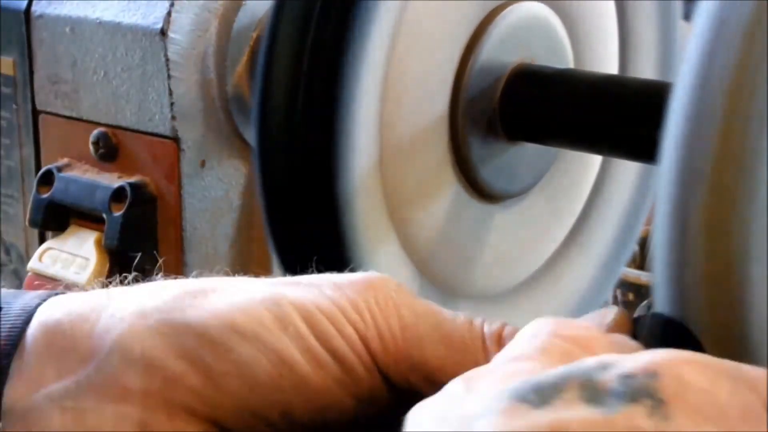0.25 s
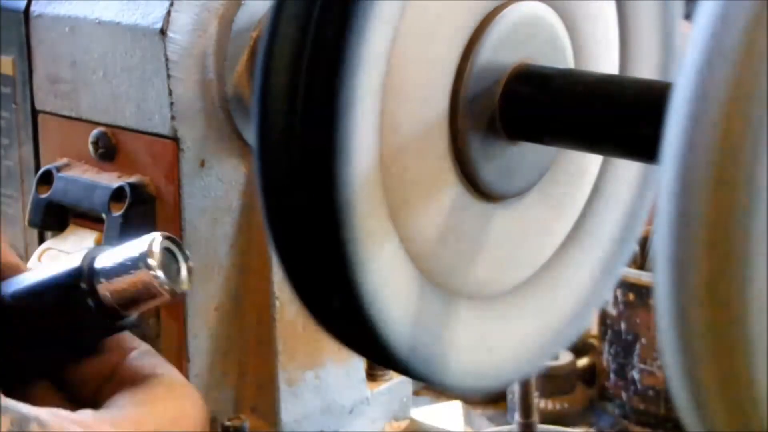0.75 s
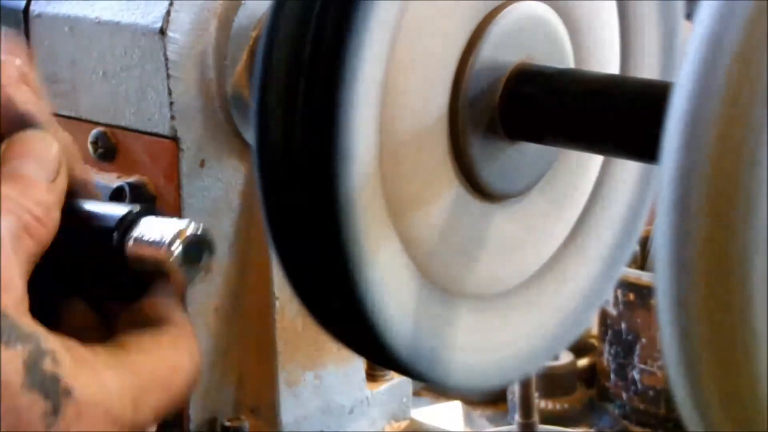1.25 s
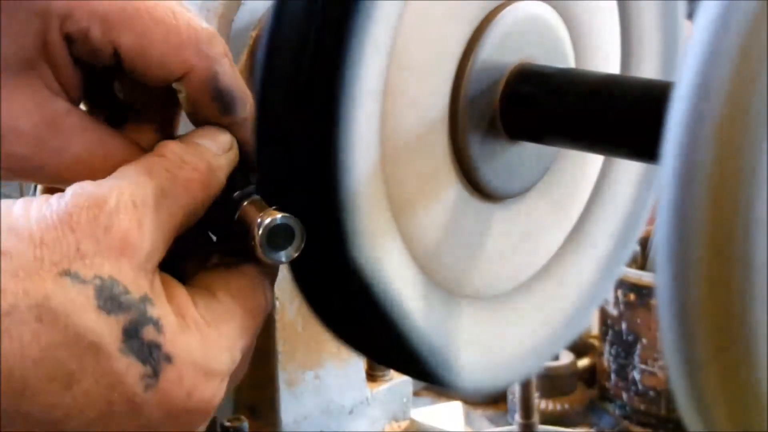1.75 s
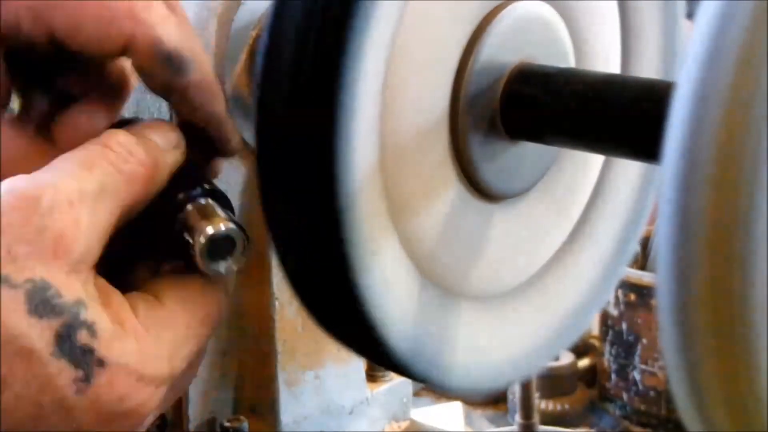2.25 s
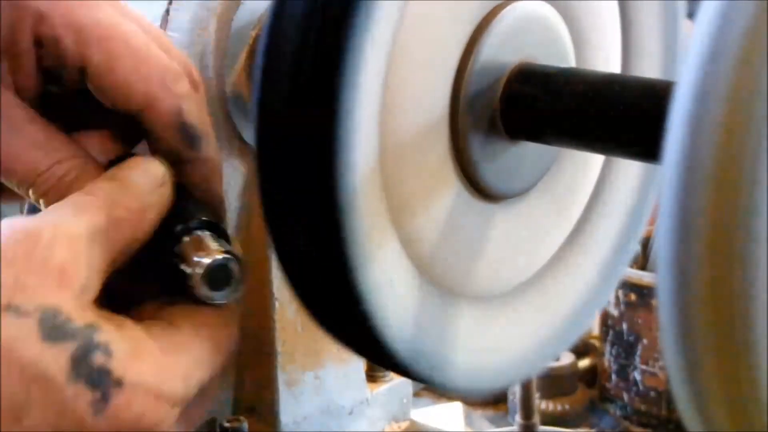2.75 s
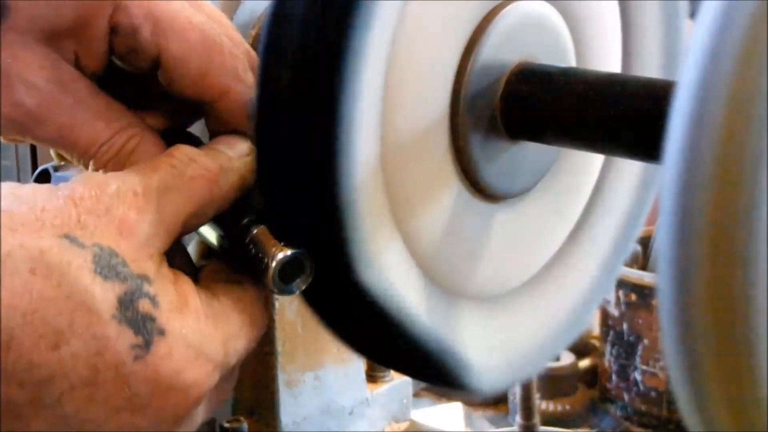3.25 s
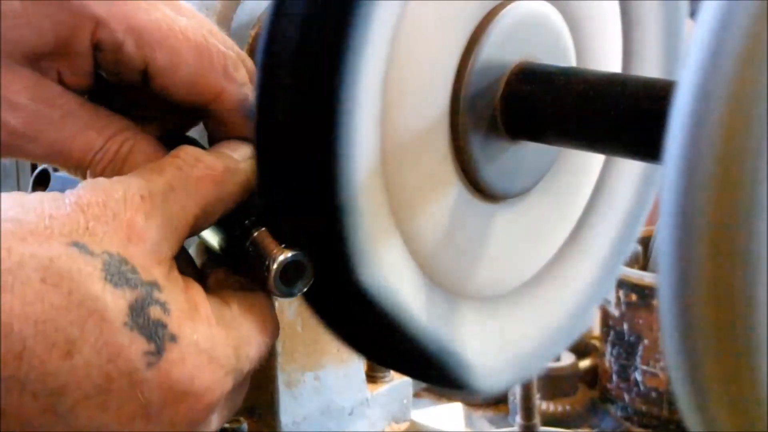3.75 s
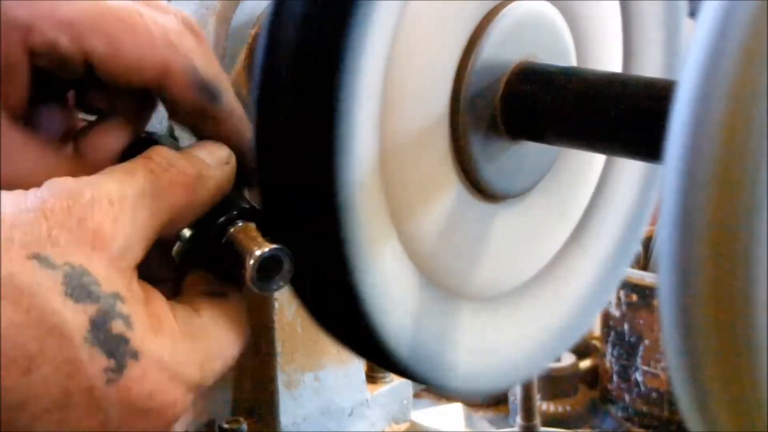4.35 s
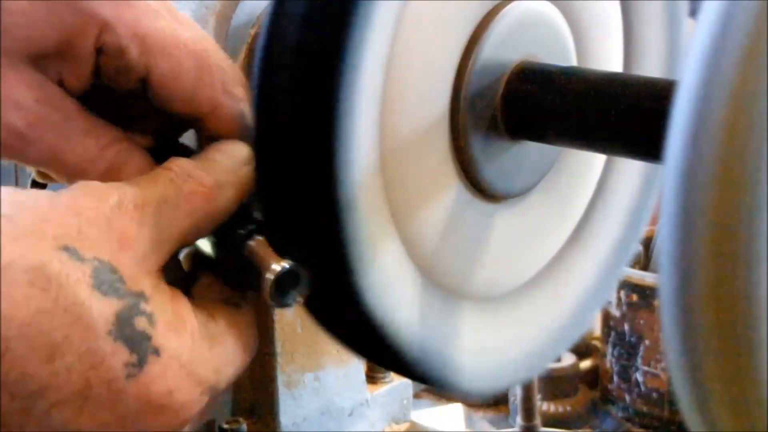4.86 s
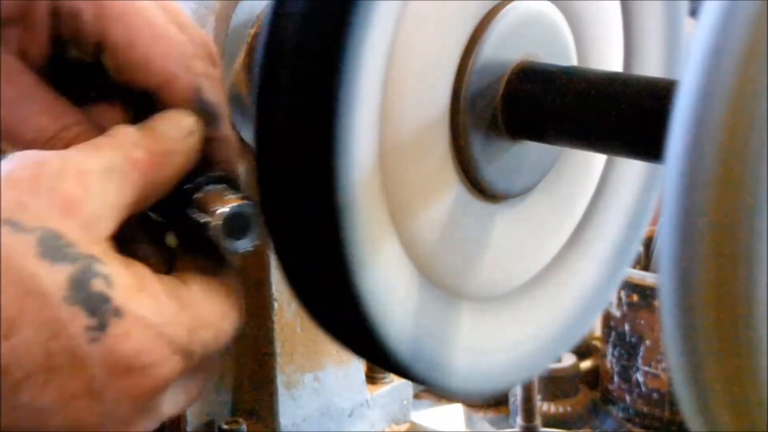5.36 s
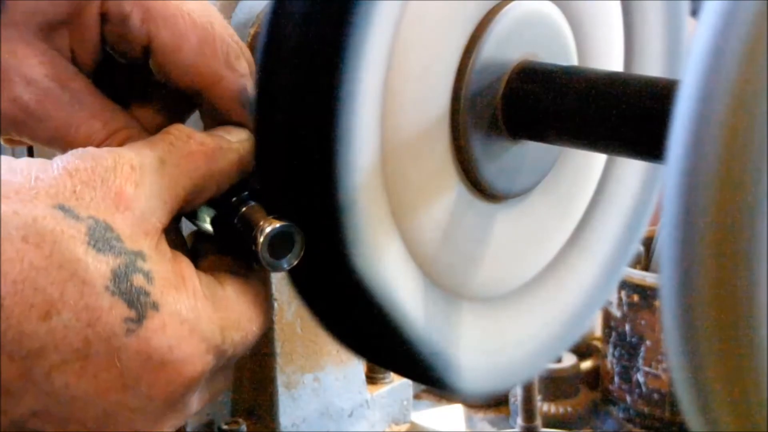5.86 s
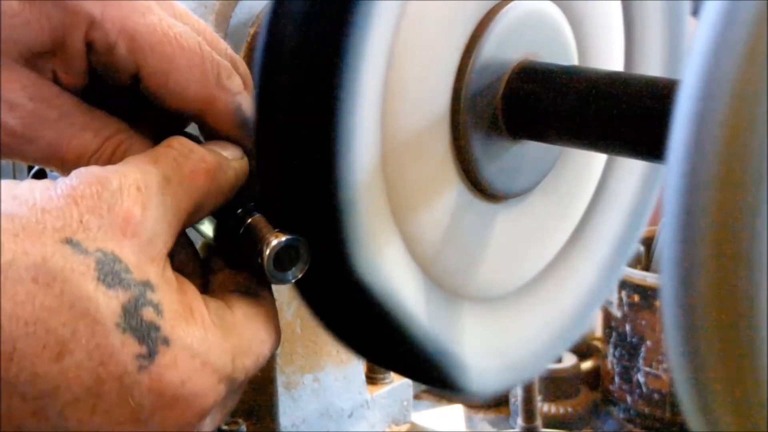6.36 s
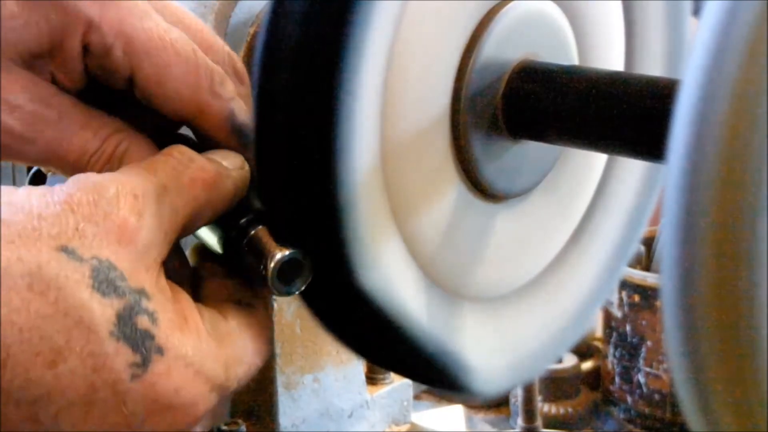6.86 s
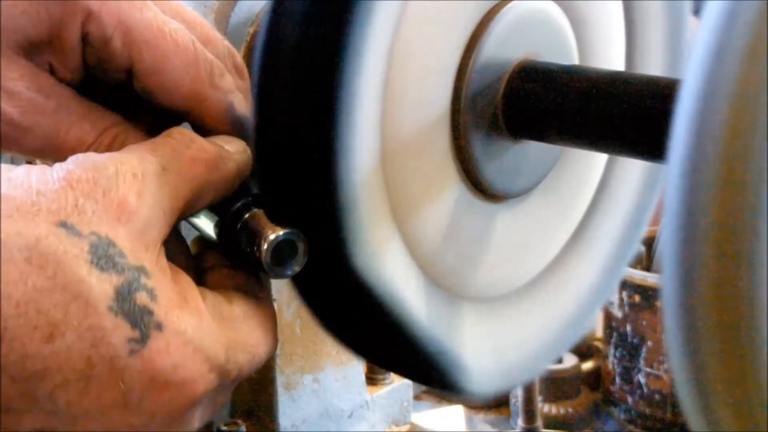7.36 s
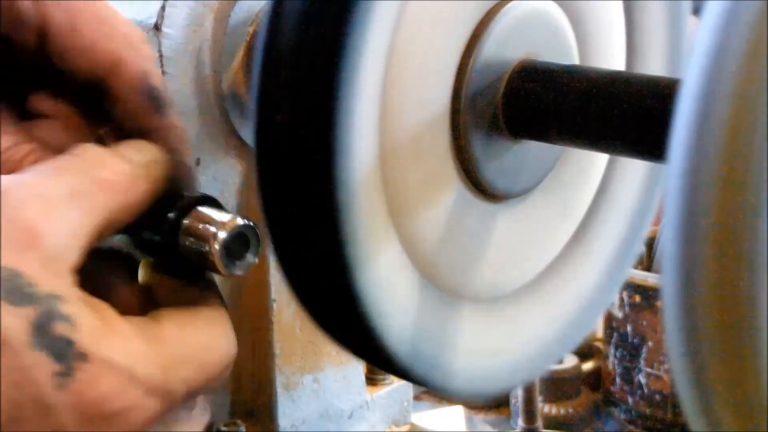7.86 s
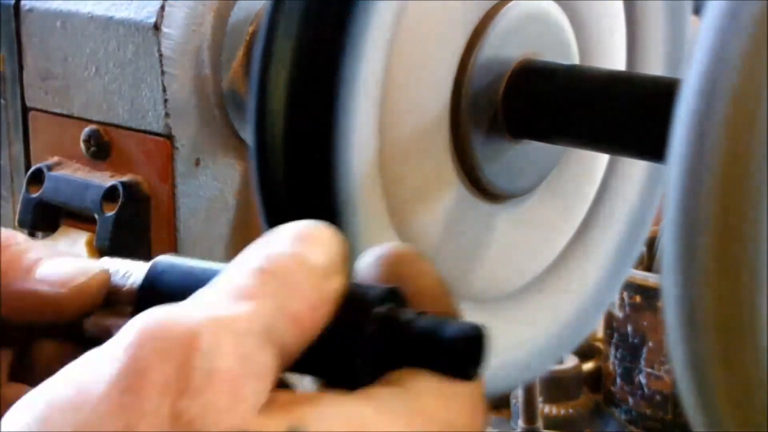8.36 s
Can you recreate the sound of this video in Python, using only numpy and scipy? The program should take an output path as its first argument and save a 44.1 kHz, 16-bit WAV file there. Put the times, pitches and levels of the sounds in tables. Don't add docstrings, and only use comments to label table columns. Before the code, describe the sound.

A buffing machine runs throughout, close to one mono microphone in a workshop: a shrill, metallic gear whine built on roughly 590 hertz with many bright overtones, slightly fluttering, wrapped in high airy hiss. Until about 0.5 s light grazes dip the pitch a little amid soft hand bumps and shuffling. A distant low compressor drone stops near 0.9 s, leaving faint mains hum and floor rumble. Small hollow taps sound at 0.7 and 1.2 s, then a hard double knock at 1.3 s and a ringing tap at 1.43 s. From about 1.6 to 7.85 s the piece is pressed repeatedly, in pushes of a quarter to half a second; each drags the whine down by several percent, adding coarse bearing rattle and cloth rubbing, then it springs quickly back up. One hollow tap comes at 5.3 s. After 7.9 s the free, clear whine continues steadily to the end, around 8.6 s.

```python
import sys
import numpy as np
from scipy import signal
from scipy.fft import rfft, irfft, next_fast_len
from scipy.io import wavfile
from scipy.ndimage import uniform_filter1d

SR = 44100
rng = np.random.default_rng(int(sys.argv[2]) if len(sys.argv) > 2 else 0)


def voltage_ratio(decibels):
    exponent = np.asarray(decibels, float) / 20
    return 10 ** exponent


def to_wav(s):
    ch = np.atleast_2d(s).T
    pcm = np.round(np.clip(ch, -1, 1) * 32767)
    wavfile.write(sys.argv[1], SR, pcm.astype(np.int16))


N = 379252

PARTNERS = [-.288, -.0752, 0, .0752, .288]


def unit(x):
    return x / np.sqrt(np.mean(x ** 2) + 1e-20)


def curve(rows):
    times, values = np.transpose(rows)
    return np.interp(np.arange(N) / SR, times, values)


def wobble(rate, step=1):
    knots = rng.standard_normal(int(N * rate / SR) + 4)
    return np.interp(np.arange(0, N, step) * rate / SR, np.arange(len(knots)), knots)


def noise(response):
    m = next_fast_len(N)
    white = rfft(rng.standard_normal(m)) * np.sqrt(SR / 2)
    return irfft(white * response(np.fft.rfftfreq(m, 1 / SR) + 1), m)[:N]


def colour(points):
    hz, db = np.transpose(points)
    return lambda f: voltage_ratio(np.interp(np.log(f), np.log(hz), db))


def resonances(peaks):
    return lambda f: sum(voltage_ratio(db) * np.sqrt(w) * f / (c * c - f * f + 1j * f * w) for c, w, db in peaks)


def casing_db(hz):
    # (frequency [Hz], width [Hz], lift [dB])
    modes = [(2170, 130, 9), (2845, 120, 10), (7000, 300, 5), (8850, 300, 5), (12200, 340, 10),
             (13430, 480, 10), (15200, 400, 7)]
    power = sum(voltage_ratio(db) ** 2 / (1 + (2 * (hz - c) / w) ** 2) ** 2 for c, w, db in modes)
    return 10 * np.log10(1 + power)


def spindle():
    # (touch [s], bite [s], sag at bite [Hz], lift [s], sag at lift [Hz])
    pushes = [(-.1, 0, 3.5, .14, 11), (.23, .34, 11, .455, 12.8), (1.625, 1.895, 38.5, 2.025, 11),
              (1.97, 2.12, 17.5, 2.24, 26.5), (2.412, 2.6, 43.5, 2.74, 52),
              (2.895, 2.985, 31.5, 3.12, 27.5), (3.0, 3.12, 27.5, 3.22, 33), (3.1, 3.22, 33, 3.345, 37.5),
              (3.46, 3.56, 21.5, 3.66, 29.5), (3.55, 3.7, 29, 3.885, 42), (4.034, 4.139, 29.5, 4.254, 39),
              (4.15, 4.254, 39, 4.352, 25), (4.485, 4.665, 43, 4.81, 35), (4.7, 4.81, 35, 4.897, 34),
              (5.03, 5.077, 10, 5.363, 32.5), (5.5, 5.62, 15, 5.8, 23), (5.6, 5.8, 23, 5.95, 23.5),
              (6.1, 6.254, 26, 6.516, 34.5), (6.652, 6.758, 23, 6.943, 38), (7.095, 7.3, 27.5, 7.457, 36.5),
              (7.605, 7.79, 37.5, 7.843, 39.5)]
    free_hz, recover_s, inertia_s = 591.75, .036, .016
    t = np.arange(N) / SR
    sags = [np.interp(t, [touch, bite, lift, lift + recover_s], [0, first, last, 0])
            for touch, bite, first, lift, last in pushes]
    sag = np.max(sags, axis=0)
    return free_hz - uniform_filter1d(sag, size=round(inertia_s * SR), mode="nearest")


def partners(states):
    # (multiple, loaded below [dB], idle below [dB], loaded above [dB], idle above [dB])
    far_rows = [(10, -60, -60, -60, -60), (12, -58, -47, -48, -47), (15, -50, -43, -55, -44),
                (19, -60, -56, -60, -52), (21, -40, -35, -60, -45), (24, -39, -39, -50, -38),
                (26, -52, -42, -42, -35), (28, -50, -40, -42, -40)]
    multiple, *far = np.transpose(far_rows)
    under, under_idle, over, over_idle = (np.interp(states[0][0], multiple, db) for db in far)
    loaded = len(states) - 1
    return [[under] * loaded + [under_idle], *np.transpose(states)[1:], [over] * loaded + [over_idle]]


def gears(teeth, speed, rough, drift):
    # (multiple, below [dB], centre [dB], above [dB])
    forced = [(2, -61, -48, -59), (3, -45, -41, -42), (4, -33, -32, -39), (5, -43, -38, -38),
              (6, -44, -36, -47), (7, -47, -37, -45), (8, -46, -44, -51), (9, -60, -57, -59),
              (10, -49, -46, -49), (11, -47, -39, -45), (12, -36, -39, -43), (13, -41, -35, -39),
              (14, -32, -44, -39), (15, -41, -39, -34), (16, -32, -38, -33), (17, -43, -47, -41),
              (18, -48, -59, -45), (19, -51, -56, -51), (20, -43, -50, -43), (21, -31, -40, -45),
              (22, -28, -36, -33), (23, -39, -41, -39), (24, -30, -44, -32), (25, -32, -38, -33),
              (26, -44, -42, -32), (27, -47, -49, -37), (28, -40, -40, -40)]
    pressed = [(2, -61, -48, -56), (3, -43, -45, -41), (4, -37, -33, -37), (5, -40, -29, -37),
               (6, -40, -38, -49), (7, -46, -34, -48), (8, -47, -47, -61), (9, -61, -50, -54),
               (10, -47, -46, -47), (11, -50, -41, -37), (12, -36, -37, -37), (13, -46, -40, -46),
               (14, -40, -38, -36), (15, -42, -38, -35), (16, -35, -41, -33), (17, -38, -45, -42),
               (18, -60, -61, -44), (19, -50, -48, -53), (20, -37, -46, -45), (21, -40, -49, -46),
               (22, -27, -36, -39), (23, -43, -55, -39), (24, -31, -35, -25), (25, -38, -54, -40),
               (26, -42, -44, -34), (27, -35, -36, -28), (28, -40, -40, -40)]
    leaning = [(2, -55, -50, -53), (3, -46, -50, -42), (4, -40, -35, -42), (5, -38, -31, -41),
               (6, -37, -39, -60), (7, -51, -32, -50), (8, -46, -52, -61), (9, -61, -48, -52),
               (10, -49, -46, -55), (11, -40, -43, -37), (12, -39, -36, -33), (13, -41, -38, -43),
               (14, -35, -40, -37), (15, -38, -32, -30), (16, -33, -38, -32), (17, -40, -44, -39),
               (18, -44, -51, -44), (19, -55, -50, -51), (20, -35, -55, -44), (21, -39, -39, -37),
               (22, -32, -39, -38), (23, -32, -47, -38), (24, -25, -32, -31), (25, -42, -39, -29),
               (26, -37, -40, -33), (27, -37, -41, -27), (28, -40, -40, -40)]
    touching = [(2, -51, -49, -52), (3, -45, -51, -38), (4, -36, -44, -46), (5, -45, -36, -42),
                (6, -40, -40, -44), (7, -46, -42, -44), (8, -49, -52, -60), (9, -59, -48, -50),
                (10, -48, -50, -53), (11, -41, -38, -36), (12, -37, -26, -34), (13, -32, -39, -36),
                (14, -35, -38, -32), (15, -32, -32, -33), (16, -31, -41, -36), (17, -38, -42, -35),
                (18, -49, -47, -44), (19, -51, -53, -46), (20, -38, -41, -44), (21, -29, -37, -37),
                (22, -43, -44, -40), (23, -32, -35, -27), (24, -36, -41, -35), (25, -42, -35, -30),
                (26, -30, -30, -24), (27, -39, -34, -32), (28, -40, -40, -40)]
    idle = [(2, -55, -57, -54), (3, -45, -38, -36), (4, -37, -48, -47), (5, -44, -29, -57),
            (6, -47, -41, -48), (7, -44, -30, -48), (8, -60, -46, -60), (9, -53, -60, -57),
            (10, -51, -46, -43), (11, -44, -42, -40), (12, -40, -32, -38), (13, -33, -55, -41),
            (14, -44, -46, -30), (15, -30, -39, -25), (16, -29, -46, -32), (17, -51, -50, -40),
            (18, -55, -49, -42), (19, -53, -44, -60), (20, -56, -46, -44), (21, -29, -43, -41),
            (22, -45, -60, -38), (23, -25, -34, -34), (24, -39, -37, -27), (25, -34, -36, -33),
            (26, -39, -37, -23), (27, -40, -40, -40), (28, -40, -40, -40)]
    state_hz = [548, 558, 570, 583, 591]
    swell = {3: 1, 4: .45, 5: 1, 7: .3}
    # (time [s], level [dB])
    shade = [
        (0, 0),
        (1.25, 0),
        (1.33, -6),
        (8.04, -6),
        (8.1, 0),
    ]
    shaded, shaft = 16, 1 / 16
    grip_db = 1.3
    step, out = 16, np.zeros(N)
    at, turn, rate = np.arange(0, N, step), teeth[::step], speed[::step]
    free = np.clip((rate - 575) / 18, .15, 1)
    for states in zip(forced, pressed, leaning, touching, idle):
        k, slow, start = round(states[0][0]), 0, rng.uniform(0, 2 * np.pi)
        late = rng.uniform(0, 80)
        for offset, level_db in zip(PARTNERS, partners(states)):
            force_db = level_db - casing_db((k + offset) * np.array(state_hz))
            level = voltage_ratio(np.interp(rate, state_hz, force_db) + casing_db((k + offset) * rate))
            quarter = np.pi / 2 * (1 - swell.get(k, 0))
            lead = start + (offset != 0) * rng.normal(quarter, .3 + k / 50)
            slow = slow + level * np.exp(1j * (offset * (turn + late) + lead))
        slow = slow * (1 + 2j * (k / 33) ** 1.5 * free * np.cos(shaft * (turn + late)))
        grit = wobble(220, step) + 1j * wobble(220, step)
        slow = slow * (1 + rough * np.sqrt(k / 15) * grit)
        slow = slow * np.exp(1j * drift * k * wobble(14, step))
        slow = slow * voltage_ratio(grip_db * (1 - free) * wobble(11, step))
        if k == shaded:
            slow = slow * voltage_ratio(curve(shade)[::step])
        out += np.interp(np.arange(N), at, slow.real) * np.cos(k * teeth)
        out -= np.interp(np.arange(N), at, slow.imag) * np.sin(k * teeth)
    return np.sqrt(2) * out


def bearing(teeth, load):
    # (multiple of ball passes, level [dB])
    ball_overtones = [(14, -51), (16, -47), (17, -51), (18, -45), (19, -50), (20, -47), (21, -44), (22, -50),
                      (24, -49), (25, -43), (26, -40), (27, -37), (28, -50), (29, -44), (30, -47), (31, -38),
                      (32, -49), (33, -50), (34, -44), (35, -42), (36, -38), (37, -46), (38, -52), (39, -50),
                      (40, -45), (41, -49), (44, -50), (45, -52), (47, -50),
                      (12, -57), (13, -58), (15, -58), (23, -55), (42, -54), (43, -56), (46, -54), (48, -50),
              (49, -56), (51, -52), (52, -55), (53, -49), (54, -49), (56, -48), (57, -52), (58, -46),
              (59, -47), (60, -49), (62, -48), (63, -48), (64, -46), (65, -52), (80, -45), (102, -47),
              (106, -46)]
    # (multiple of tooth rate, level [dB])
    stray_lines = [(2.894, -42), (3.256, -38), (3.404, -44), (3.48, -42), (3.548, -45), (4.52, -54),
                   (4.85, -46), (7.18, -49), (7.41, -53), (8.11, -54), (9.52, -51), (9.7, -50),
                   (13.72, -41), (14.44, -43), (16.3, -41), (17.14, -44), (17.45, -41), (18.95, -39),
                   (19.71, -42), (21.54, -43), (22.23, -39), (22.6, -39), (24.3, -38), (25.35, -39),
                   (26.23, -37)]
    balls = .1808
    graze_end_s, graze_db = .5, -7

    def line(k, db):
        return voltage_ratio(db + 1.2 * wobble(12)) * np.sin(k * teeth + rng.uniform(0, 2 * np.pi))

    comb = sum(line(k * balls, db) for k, db in ball_overtones)
    strays = sum(line(k, db) for k, db in stray_lines)
    grazing = np.arange(N) < graze_end_s * SR
    return np.sqrt(2) * (voltage_ratio(2 + graze_db * grazing) * load * comb + (1 - load) ** 2 * strays)


def airflow(teeth, load):
    # (frequency [Hz], level [dB per Hz])
    motor = [(300, -130), (1100, -95), (1600, -73), (2600, -73.5), (4300, -71.5), (5300, -70.5),
             (6200, -66.5), (7200, -63), (8000, -63.5), (9000, -62), (10300, -66), (11600, -61.5),
             (13000, -60.5), (14500, -59.5), (16000, -58)]
    # (frequency [Hz], level [dB per Hz])
    cloth = [(400, -130), (1200, -92), (1800, -73), (2500, -75.5), (3300, -73), (4100, -75.5), (5000, -76),
             (7000, -90)]
    # (frequency [Hz], width [Hz], level [dB])
    housing = [(1840, 210, -49), (2035, 77, -39)]
    beat = 1 + .35 * np.cos(teeth) + .15 * np.cos(PARTNERS[3] * teeth)
    swelling = voltage_ratio(1.5 * load + .7 * wobble(25))
    hiss = beat * swelling * noise(lambda f: colour(motor)(f) * voltage_ratio(casing_db(f) / 2.2))
    rubbing = load * noise(colour(cloth))
    singing = (1 - .85 * load) * noise(resonances(housing))
    return hiss + rubbing + singing


def workshop():
    # (frequency [Hz], level [dB])
    hum_lines = [(120, -88), (168.19, -67), (168.7, -57), (240, -61), (360, -62), (454, -54), (480, -44.5),
                 (960, -44), (1424, -50), (1440, -50)]
    # (multiple of stroke rate, level [dB])
    strokes = [(12, -63), (14, -63), (15, -40), (17, -41), (18, -39.5), (20, -50), (21, -45), (22, -52),
               (24, -47)]
    # (frequency [Hz], level [dB per Hz])
    floor = [(53, -95), (90, -62), (162, -21), (307, -27), (410, -7.5), (474, -1.5), (541, -12.5),
             (625, 1.5), (768, -0.5), (953, 2), (1040, -7), (1200, -3.5), (1340, -8.5), (1420, -12),
             (1600, -13.5), (2080, -34), (3520, -120)]
    # (frequency [Hz], width [Hz], level [dB])
    room_notes = [(600, 14, -4), (640, 22, 0), (725, 22, -2), (835, 30, -1), (1130, 40, -5)]
    stroke_hz, stop_s, fade_s = 54.5, .88, .089
    t = np.arange(N) / SR
    hum = sum(voltage_ratio(db + 1.4 * wobble(3.0)) * np.sin(2 * np.pi * hz * t + 0.26 * wobble(6.5))
              for hz, db in hum_lines)
    pump = sum(voltage_ratio(db) * np.sin(2 * np.pi * k * stroke_hz * t + 0.5 * wobble(8.4) + rng.uniform(0, 1))
               for k, db in strokes)
    running = np.clip((stop_s - t) / fade_s, 0, 1)
    tones = np.sqrt(2) * (hum + running * pump)
    return tones + voltage_ratio(-40) * unit(noise(colour(floor))) + voltage_ratio(-47) * unit(noise(resonances(room_notes)))


def hands():
    # (time [s], peak [dB], frequency [Hz], t60 [s])
    bumps = [(0.031, -24, 420, 0.056), (0.083, -26, 308, 0.041), (0.13, -32, 398, 0.045),
             (0.271, -25, 347, 0.041), (0.333, -19, 290, 0.035), (0.416, -16, 450, 0.028),
             (0.414, -22, 280, 0.03), (0.471, -30, 361, 0.045), (0.675, -26, 350, 0.032),
             (0.719, -33, 371, 0.045), (0.965, -28, 350, 0.03), (1.025, -34, 371, 0.039),
             (1.092, -29, 396, 0.041), (1.133, -28, 270, 0.035), (1.176, -26, 275, 0.049),
             (1.455, -28, 400, 0.035), (1.573, -30, 385, 0.035), (1.52, -33, 220, 0.035),
             (1.661, -31, 250, 0.038), (1.726, -33, 420, 0.04), (2.575, -34, 250, 0.041),
             (3.064, -26, 600, 0.03), (3.081, -28, 330, 0.03), (0.893, -25, 700, 0.04),
             (1.02, -28, 590, 0.036), (1.066, -30, 600, 0.05), (1.16, -23, 600, 0.04),
             (0.47, -28, 830, 0.03)]
    # (time [s], peak [dB], frequency [Hz], t60 [s], pitch fall [share])
    taps = [
        (0.68, -26, 964, 0.05, .18),
        (1.204, -28, 940, 0.05, .18),
        (1.284, -8, 850, 0.044, .5),
        (1.314, -11, 740, 0.04, 0.11),
        (1.432, -17.5, 945, 0.1, 0.244),
        (5.316, -17, 970, 0.057, .18),
    ]
    # (frequency [Hz], level [dB per Hz])
    sliding = [(25, -70), (70, -52), (150, -10), (300, -6), (600, 1), (1000, -2.5), (2000, -18)]
    # (frequency [Hz], level [dB per Hz])
    arms = [(20, -12), (50, -7), (110, 2), (170, -8), (260, -60)]
    # (time [s], shuffle level [dB])
    restless = [
        (0, -36),
        (.72, -40.5),
        (1.03, -35.5),
        (1.27, -43.5),
        (1.77, -42),
        (2.39, -53),
        (3.11, -49),
        (3.7, -50.5),
        (8.6, -60),
    ]
    out, t = np.zeros(N + SR), np.arange(SR // 8) / SR
    puff = unit(noise(colour(sliding)))
    for s, db, hz, t60 in bumps:
        first = round(s * SR)
        push = np.sin(2 * np.pi * hz * t) + 0.67 * puff[first:][:len(t)]
        out[first:][:len(t)] += voltage_ratio(db - 60 * t / t60) * (1 - np.exp(-t / 0.0014)) * push
    for s, db, hz, t60, drop in taps:
        first = round((s - .006) * SR)
        cycles = hz * (t + drop * 0.0102 * (1 - np.exp(-t / 0.0076)))
        envelope = voltage_ratio(db + 7.0 - 60 * t / t60) * (1 - np.exp(-t / 0.011)) ** 2
        out[first:][:len(t)] += envelope * np.sin(2 * np.pi * cycles)
    motion_db = curve(restless)
    shuffle = voltage_ratio(motion_db + 3.0 * wobble(30)) * unit(noise(colour(sliding)))
    thud_db = -66 + 1.5 * (motion_db + 38.5) + 3.7 * wobble(22.1)
    return out[:N] + shuffle + voltage_ratio(thud_db) * unit(noise(colour(arms)))


def scene():
    machine_db, settle_s = 1.25, .04
    speed = spindle()
    teeth = 2 * np.pi * np.cumsum(speed) / SR
    load = uniform_filter1d(np.clip((590.5 - speed) / 18, 0, 1), size=round(settle_s * SR))
    whine = gears(teeth, speed, rough=.14, drift=.01)
    lathe = voltage_ratio(machine_db) * (whine + airflow(teeth, load)) + bearing(teeth, load)
    mix = lathe + workshop() + hands()
    return np.array([mix, mix])


def roll_off(x):
    return signal.sosfilt(signal.butter(12, 16740, fs=SR, output="sos"), x)


def record(dry):
    top_hz, low_cut_hz = 15770, 50
    clipped = dry / (1 + np.abs(dry / .95) ** 16) ** (1 / 16)
    m = next_fast_len(N + 4096)
    hz = np.fft.rfftfreq(m, 1 / SR)
    low_cut = hz ** 2 / (hz ** 2 + low_cut_hz ** 2)
    band = np.clip((top_hz + 50 - hz) / 100, 0, 1) ** 2 * low_cut
    mix = irfft(rfft(clipped, m) * band, m)[:, :N]
    return roll_off(mix)


dry = scene()
out = record(dry)
to_wav(out)
```